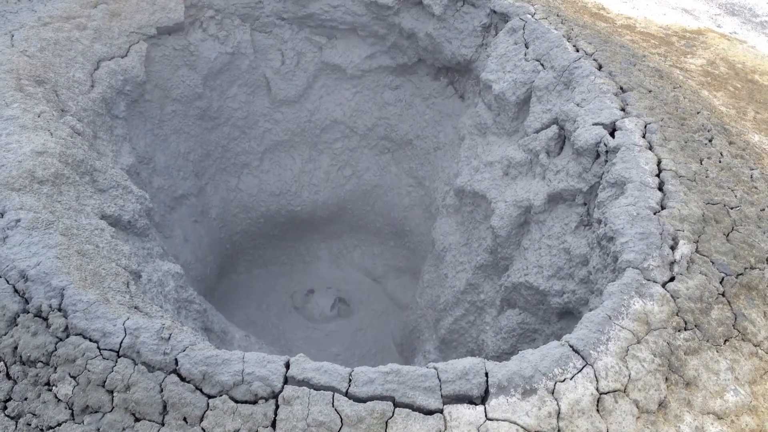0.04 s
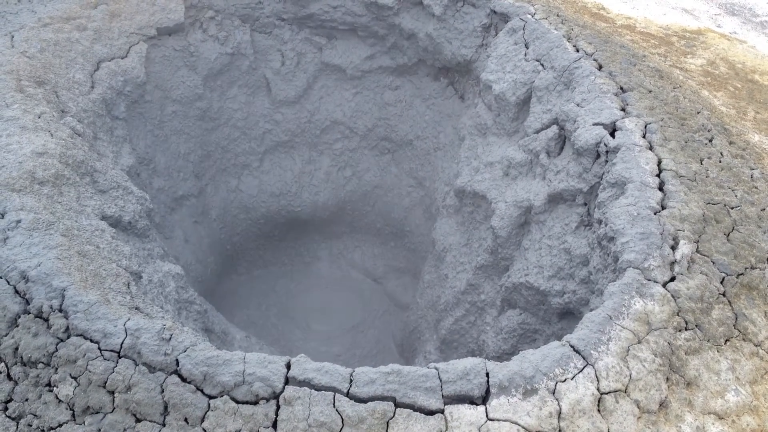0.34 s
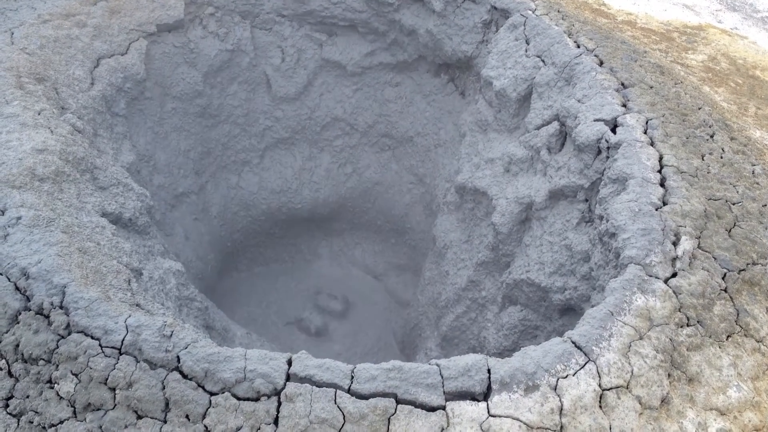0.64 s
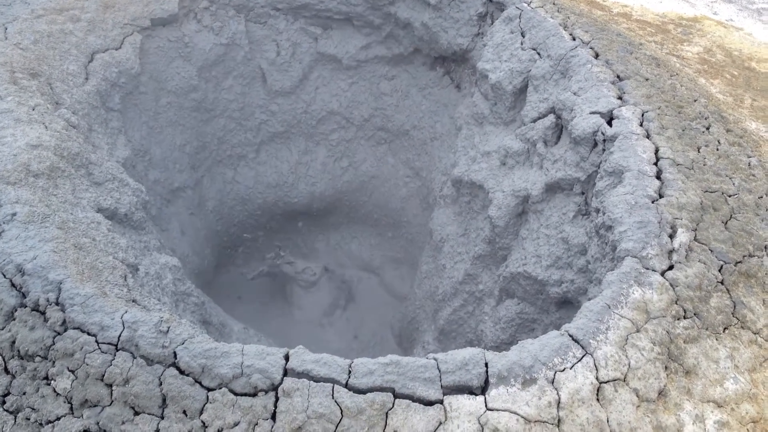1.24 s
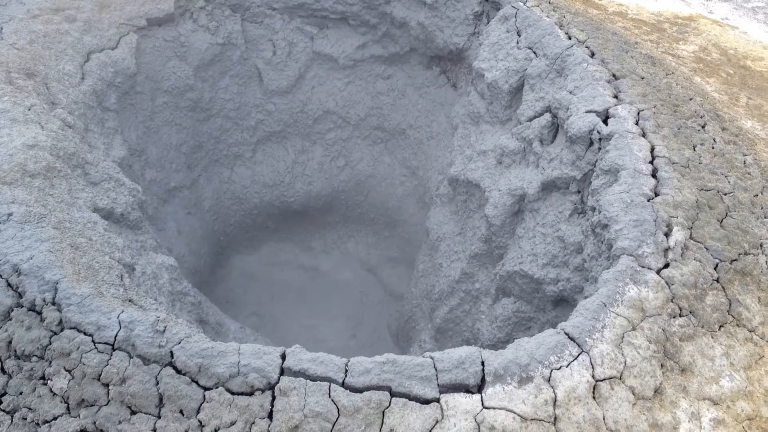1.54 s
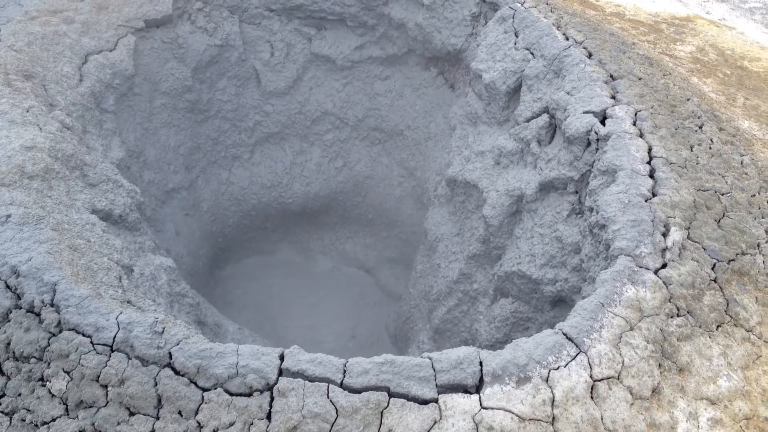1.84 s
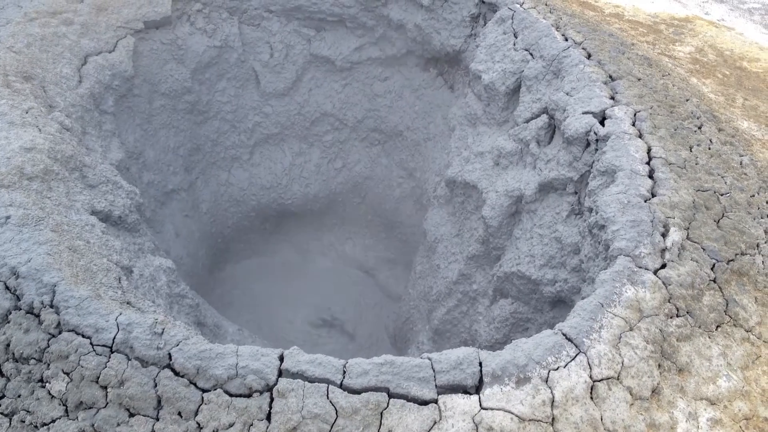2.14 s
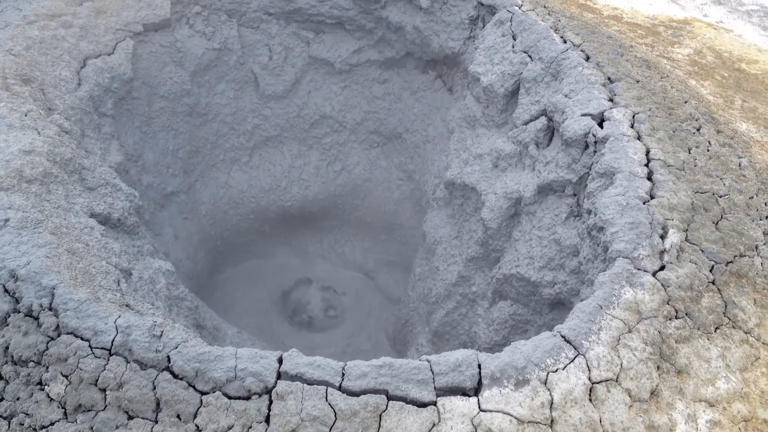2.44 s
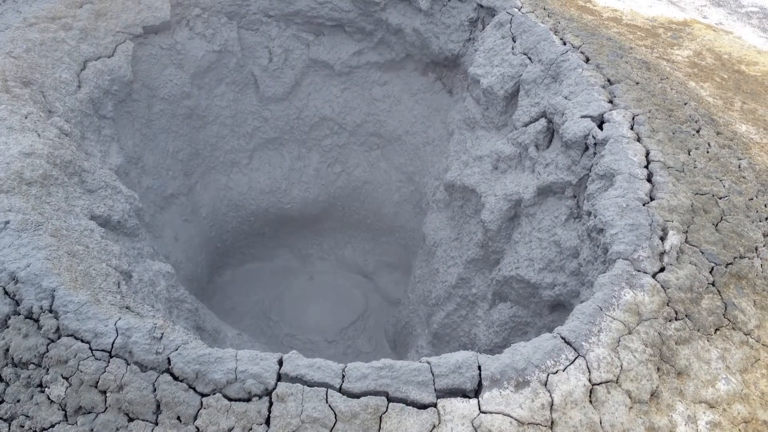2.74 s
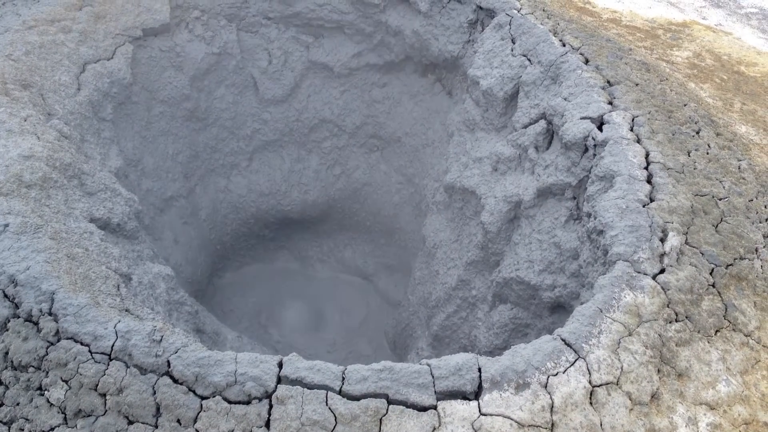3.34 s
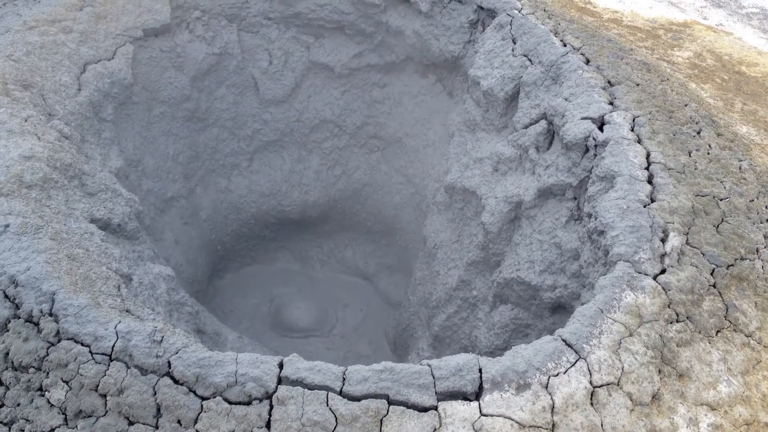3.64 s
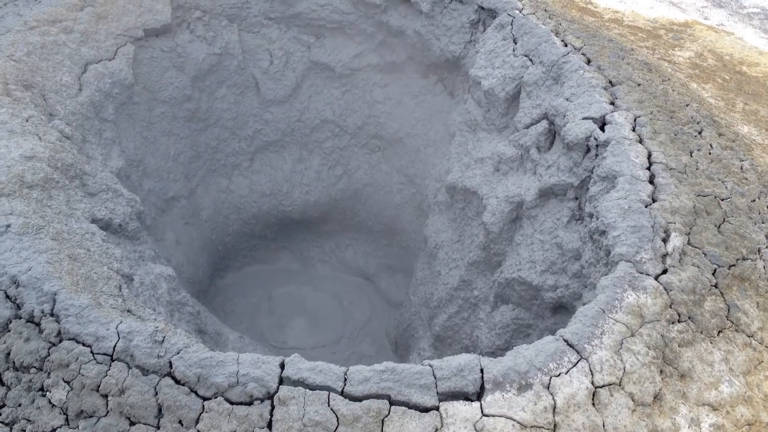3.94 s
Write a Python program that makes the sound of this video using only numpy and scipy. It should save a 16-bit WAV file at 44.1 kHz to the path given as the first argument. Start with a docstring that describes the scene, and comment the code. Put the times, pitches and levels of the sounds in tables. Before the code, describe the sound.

Thick mud boils in a small outdoor crater, heard from the rim as a steady run of deep gulps and dull plops. Brief steam spurts, wet spits and a fine fizz come through, over faint low wind.

```python
"""Gas pockets gulp in a pot of thick, boiling mud, heard from the rim of a small outdoor crater.
Each pocket is a heavily damped oscillator with a low note; some bubble skins burst with a plop.
Steam spurts through the openings as turbulent noise, tearing films spit and droplets tick.
Beneath them lie a steady churning, a fine fizz and a little wind; the mud has a deep, booming weight."""
import sys
import numpy as np
from scipy import signal
from scipy.fft import rfft, irfft
from scipy.io import wavfile
from scipy.ndimage import uniform_filter1d

SR = 44100
rng = np.random.default_rng(int(sys.argv[2]) if len(sys.argv) > 2 else 0)


def master(y):
    """Save y as 16-bit WAV."""
    cut = np.clip(np.atleast_2d(y).T, -1, 1)
    pcm = np.round(cut * 32767)  # scale
    wavfile.write(sys.argv[1], SR, pcm.astype(np.int16))


N = 176400
TIME = np.arange(N) / SR


def from_db(db):
    """Amplitude ratio of a level in decibels."""
    return 10 ** (np.asarray(db) / 20)


def unit_rms(x):
    """Normalisation to unit power."""
    return x / np.sqrt(np.mean(x ** 2) + 1e-20)


def butter(x, hz, kind, order=2):
    """Butterworth filtering."""
    return signal.sosfilt(signal.butter(order, hz, kind, fs=SR, output="sos"), x + 1e-18)


def noise(spectrum):
    """Spectral shaping of white noise by rows of f/Hz, level/dB; unit power."""
    hz, db = np.transpose(spectrum)
    bins = np.maximum(np.arange(N // 2 + 1) * SR / N, 1)
    gain = from_db(np.interp(np.log(bins), np.log(hz), db))
    return unit_rms(irfft(rfft(rng.standard_normal(N)) * gain, N))


def drift(hz):
    """Low-pass random fluctuation of unit power."""
    return unit_rms(butter(rng.standard_normal(N + SR), hz, "low")[SR:])


def bubble(t, hz, cycles, attack_s):
    """Damped oscillation of unit peak, starting at t = 0 and decaying by 1/e in `cycles` periods."""
    t = np.maximum(t, 0)
    envelope = (1 - np.exp(-t / attack_s)) * np.exp(-np.minimum(t * hz / cycles, 20))
    note = envelope * np.sin(2 * np.pi * hz * t)
    return note / np.abs(note).max()


def swarm(per_s, band_hz, db_per_octave, cycles, spread_db, count=20):
    """Superposition of bubbles: Poisson impulses excite a bank of damped resonators; unit power."""
    out = np.zeros(N)
    for hz in np.geomspace(*band_hz, count):
        born = rng.random(N) < per_s / count / SR
        sizes = from_db(spread_db * np.minimum(rng.exponential(1, N), 3)) * rng.choice([-1, 1], N)
        r, w = np.exp(-hz / cycles / SR), 2 * np.pi * hz / SR   # pole radius and angle
        ringing = signal.lfilter([0, np.sin(w)], [1, -2 * r * np.cos(w), r * r], born * sizes + 1e-18)
        out += from_db(db_per_octave * np.log2(hz / band_hz[0])) * ringing
    return unit_rms(out)


# Spectrum of the outdoor background: f/Hz, relative spectral level/dB
WIND_SPECTRUM = [(25, -31.5), (60, -16), (130, -0.5), (300, 2), (600, -15), (15000, -52.5)]
def wind():
    """Slow amplitude modulation of low noise: light gusts and the rumble of distant pools."""
    mean_db, gust_db = -38.5, 2
    return from_db(mean_db + gust_db * drift(0.99)) * noise(WIND_SPECTRUM)


CHURN_REST_DB, CHURN_COUPLING_DB = -30, -1
def churning(stirring):
    """Incoherent summation: many weak, deep pockets merge into a murmur, louder around the gulps."""
    pockets = swarm(per_s=720, band_hz=(150.8, 914), db_per_octave=-4.5, cycles=1.08, spread_db=2)
    gain = from_db(CHURN_REST_DB) + from_db(CHURN_COUPLING_DB) * stirring
    return gain * butter(pockets, 655, "low")


# Spectrum of escaping steam, here and in the spurts: f/Hz, relative spectral level/dB
STEAM_SPECTRUM = [(600, -6), (1100, 0.5), (2000, -4), (2700, -6), (3900, -4), (5700, -15), (11000, -17.5),
                  (15000, -22.5)]
# Envelope of the surface fizz: t/s, level/dB
FIZZ_ENVELOPE = [(0, -58.5), (1.1, -57), (1.7, -59.5), (2.5, -54), (3.15, -60.5), (4, -49)]
def fizz():
    """Small bubbles resonate high: they crackle and blip in clumps while steam seeps between them."""
    crackle = swarm(per_s=800, band_hz=(1460, 12300), db_per_octave=-5, cycles=0.87, spread_db=5.5)
    blips = swarm(per_s=98, band_hz=(1323, 3550), db_per_octave=-2, cycles=5, spread_db=4)
    envelope = from_db(np.interp(TIME, *np.transpose(FIZZ_ENVELOPE)))
    clumps = from_db(4 * drift(20))
    seep = from_db(-1.5) * noise(STEAM_SPECTRUM)
    return envelope * clumps * (crackle + from_db(-2.5) * blips + seep)


# Gas pockets heaving in the mud: t/s at the peak, level/dB, f/Hz
GAS_POCKETS = [(0.024, -19, 214), (0.076, -11.5, 197.0), (0.186, -25.5, 171), (0.218, -11.5, 328),
               (0.232, -9.5, 206), (0.283, -10, 205), (0.335, -18.5, 165), (0.413, -9, 238),
               (0.452, -9.5, 218), (0.477, -12, 244.0), (0.494, -5.5, 175), (0.574, -9, 197),
               (0.641, -8, 222), (0.704, -9, 220), (0.732, -15, 240.0), (0.796, -16, 240),
               (0.815, -7.5, 258), (0.888, -9.5, 333), (0.908, -14, 210.0), (0.934, -21.5, 217),
               (1.017, -11, 220), (1.053, -7, 333), (1.15, -13, 243), (1.233, -15, 238),
               (1.292, -13.5, 253), (1.343, -13, 178), (1.377, -12.5, 209), (1.427, -7.5, 224),
               (1.648, -14.5, 272), (1.753, -9.5, 255), (1.781, -8.5, 238.0), (1.828, -6.5, 200),
               (1.852, -5.5, 222), (1.908, -9.5, 242), (1.969, -8.0, 229.0), (1.986, -9.5, 210),
               (2.034, -9, 263), (2.072, -11, 200), (2.169, -11.5, 223), (2.207, -16.5, 237),
               (2.259, -9.5, 266), (2.335, -12.5, 233), (2.416, -11.5, 190), (2.475, -11, 268),
               (2.494, -16.5, 216), (2.557, -7.5, 204), (2.69, -8.5, 203), (2.716, -11, 217),
               (2.771, -8.5, 288), (2.793, -10.5, 205), (2.818, -3.5, 251), (2.845, -3.5, 277),
               (2.869, -7.5, 200), (2.885, -9.5, 252), (2.912, -6.5, 286), (2.966, -8, 254.0),
               (3.029, -15, 224), (3.047, -12.5, 205), (3.077, -15.5, 230.0), (3.102, -10, 206),
               (3.261, -13, 232), (3.338, -45, 198.0), (3.37, -13, 210), (3.402, -13, 228),
               (3.442, -14.5, 250), (3.488, -16.5, 212), (3.558, -14, 244), (3.657, -18, 190),
               (3.722, -12, 203), (3.803, -14, 207.0), (3.99, -11.5, 226)]
def gulps():
    """Damped resonance of pockets whose pitch climbs as they surface; returns sound and envelope."""
    swell_cycles, decay_cycles, rise_per_cycle = 0.5, 0.94, 0.033
    tone, heave = np.zeros(N), np.zeros(N)
    for onset, db, hz in GAS_POCKETS:
        near = np.abs(TIME - onset) * hz < 10
        cycle = (TIME[near] - onset) * hz
        time_constant = np.where(cycle < 0, swell_cycles, decay_cycles)
        envelope = from_db(db) * np.exp(.5 - np.hypot(.5, cycle / time_constant))
        tone[near] += envelope * np.cos(2 * np.pi * (cycle + rise_per_cycle * cycle ** 2 / 2))
        heave[near] += envelope
    # The neck of a pocket flaps unevenly; by a power law, strong gulps are more ragged.
    flutter = unit_rms(butter(rng.standard_normal(N), (305, 554), "band"))
    return from_db(-0.5) * tone + from_db(-14) * heave ** 1.18 * flutter, heave


# Thin films of mud tearing: t/s, level/dB
FILM_TEARS = [(0.132, -31.5), (.1365, -26), (0.763, -36), (1.015, -30.5), (1.113, -36), (1.259, -39.5),
              (1.394, -22.5), (1.408, -21), (1.422, -32), (1.491, -35.5), (2.066, -39.5), (2.247, -39),
              (2.605, -27), (3.42, -42.5), (3.583, -42), (3.607, -39.5), (3.650, -47)]
# Spectrum of a tear: f/Hz, relative spectral level/dB
TEAR_SPECTRUM = [(900, 1), (3600, 8), (6000, 2.5), (12000, -4), (15000, -6)]
def spits():
    """Source and filter: each tearing film gives a noise burst, coloured by its opening's resonance."""
    decay_s, opening_hz = 0.0036, (2360, 4570)
    tear, out = noise(TEAR_SPECTRUM), np.zeros(N)
    for (onset, db), hz in zip(FILM_TEARS, rng.uniform(*opening_hz, len(FILM_TEARS))):
        envelope = (TIME >= onset) * np.exp(-np.clip((TIME - onset) / decay_s, 0, 20))
        burst = from_db(db) * envelope * tear
        resonance = signal.lfilter(*signal.iirpeak(hz, Q=10, fs=SR), burst)
        out += burst + from_db(-1) * resonance
    return out


# Steam pushed through the mud: t/s at the peak, width/s, level/dB, treble gain/dB
STEAM_JETS = [(0.143, 0.016, -40, 0), (0.289, 0.014, -39, 1), (0.431, 0.029, -30.5, -20),
              (0.77, 0.017, -35.5, 2), (1.126, 0.091, -43.5, 3), (1.406, 0.023, -31, -8),
              (1.498, 0.043, -51.5, 10.5), (1.934, 0.017, -37.5, -19), (2.021, 0.011, -33.5, -21),
              (2.426, 0.02, -45, 0), (2.528, 0.016, -41.5, 5.5), (2.611, 0.043, -39.5, 1),
              (2.888, 0.045, -36.5, -19), (3.067, 0.037, -61.5, 18.5), (3.483, 0.026, -38, -5),
              (3.845, 0.022, -30.5, -16)]
def spurts():
    """Turbulent jet noise swells and fades at wet openings, sputtering and throwing specks of mud."""
    specks = swarm(per_s=790, band_hz=(1477, 12240), db_per_octave=0, cycles=6, spread_db=2.5)
    hiss = butter(noise(STEAM_SPECTRUM), 600, "high")
    sputter = from_db(drift(200) - 2.66)
    jet = hiss * sputter + from_db(-8) * specks
    body = butter(jet, 5280, "low", order=1)
    treble, out = jet - body, np.zeros(N)
    for peak_s, width_s, db, treble_db in STEAM_JETS:
        steepness = np.where(TIME < peak_s, .9, .6)   # the rise is faster than the fall
        flow = from_db(db) / np.cosh(np.clip(2 * (TIME - peak_s) / width_s, -20, 20)) ** steepness
        out += flow * (body + from_db(treble_db) * treble)
    return out


# Bubble skins bursting: t/s, level/dB, f/Hz
SKIN_BURSTS = [(.215, -16, 563), (0.2656, -18, 880), (.477, -16.5, 720), (.885, -18, 590),
               (1.052, -11, 495), (1.490, -18.5, 720), (1.852, -18.5, 675), (2.109, -15, 830),
               (2.351, -19, 760), (2.698, -14, 580), (2.729, -14.5, 1100), (2.853, -14, 760),
               (2.887, -9.5, 617), (2.908, -18.5, 800), (3.369, -21.5, 650), (3.438, -5, 450),
               (3.706, -18.5, 700), (3.712, -4.5, 433)]
def plops():
    """Viscous damping: the dull, ragged snap of a bursting skin decays in about one period."""
    snaps = sum(from_db(db) * bubble(TIME - onset, hz, cycles=0.95, attack_s=0.0001)
                for onset, db, hz in SKIN_BURSTS)
    roughness = 1 + 0.24 * drift(510)
    return butter(snaps * roughness, 1410, "low")


# Droplets and small wet squelches: t/s, level/dB, f/Hz, decay time/s
DROPLET_NOTES = [(.283, -40, 4290, 0.013), (.377, -38.5, 2200, 0.01), (1.016, -30, 3060, 0.0086),
                 (1.187, -37.5, 2700, 0.0051), (1.394, -13.5, 1970, 0.0012), (1.422, -23, 2010, 0.0017),
                 (1.448, -21.5, 1660, 0.0017), (2.208, -33.5, 2100, 0.0058), (2.290, -38.5, 1800, 0.0093),
                 (2.448, -41, 2770, 0.0043), (2.604, -19, 3860, 0.001), (2.624, -30, 2530, 0.004),
                 (3.239, -43, 2400, 0.0044), (3.483, -32, 2430, 0.01), (3.701, -40, 2980, .005)]
def droplets():
    """Free vibration of small bubbles, whose pitch wavers by random phase modulation."""
    unsteady_time = TIME + 18e-6 * drift(230)
    return sum(from_db(db) * bubble(unsteady_time - onset, hz, cycles=decay_s * hz, attack_s=0.00012)
               for onset, db, hz, decay_s in DROPLET_NOTES)


def low_boom(x):
    """Band emphasis: a broad lift around 160 Hz gives the bubbling mud a deep, booming weight."""
    return x + from_db(-9) * butter(x, (137, 177), "band", order=1)


def scene():
    """Superposition of the boiling pot and the wind; churning and fizz follow the gulps."""
    smoothing_s, fizz_exponent = 0.038, 0.14
    gulping, heave = gulps()
    stirring = np.maximum(uniform_filter1d(heave, int(smoothing_s * SR)), 0)
    surface = fizz() * unit_rms((from_db(CHURN_REST_DB) + stirring) ** fizz_exponent)
    pot = gulping + churning(stirring) + plops() + spurts() + spits() + droplets() + surface
    return (low_boom(pot) + wind())[None]


def record(dry):
    """Band limiting: the microphone thins the bass and rejects rumble; the top is cut steeply."""
    bass_hz, rumble_hz, top_hz = 143, 57, 15400
    thinned = butter(butter(dry, bass_hz, "high"), rumble_hz, "high")
    return signal.sosfilt(signal.ellip(10, .2, 80, top_hz, fs=SR, output="sos"), thinned)


dry = scene()
out = record(dry)
master(out)
```